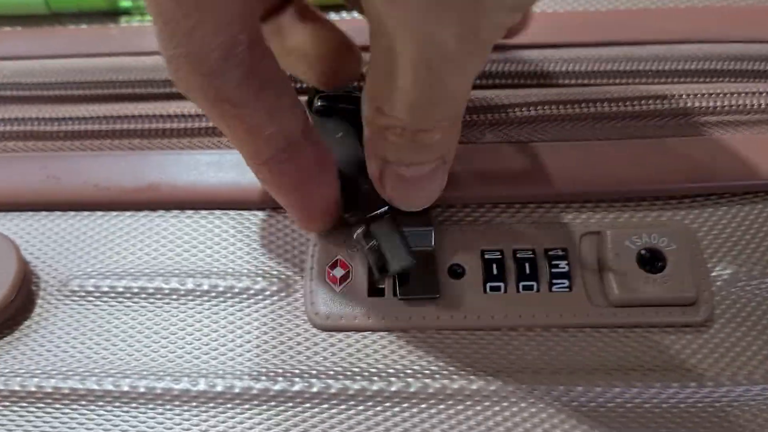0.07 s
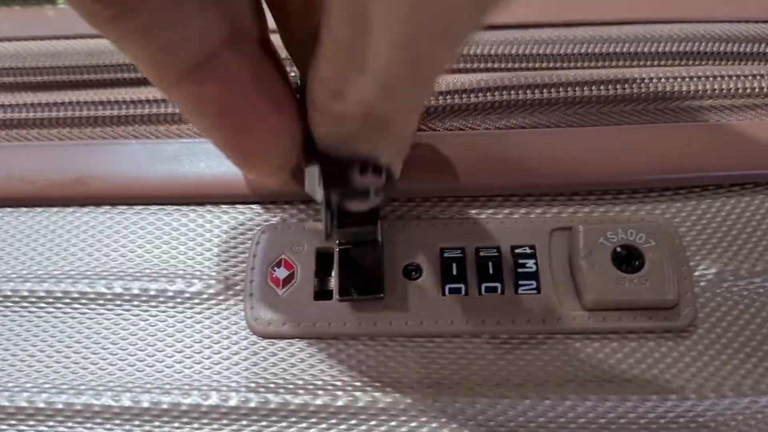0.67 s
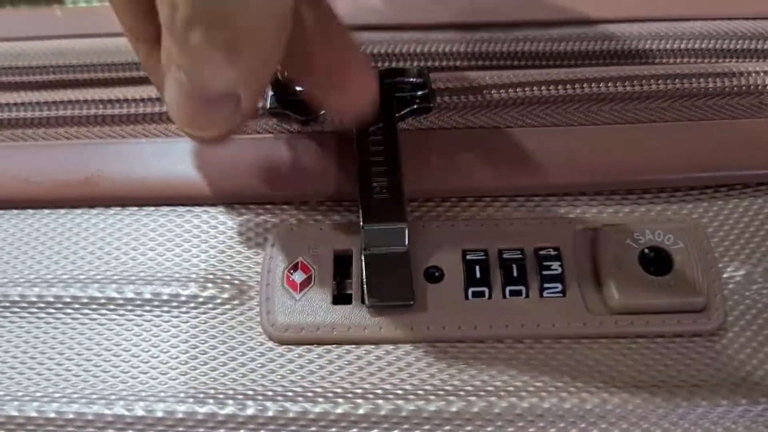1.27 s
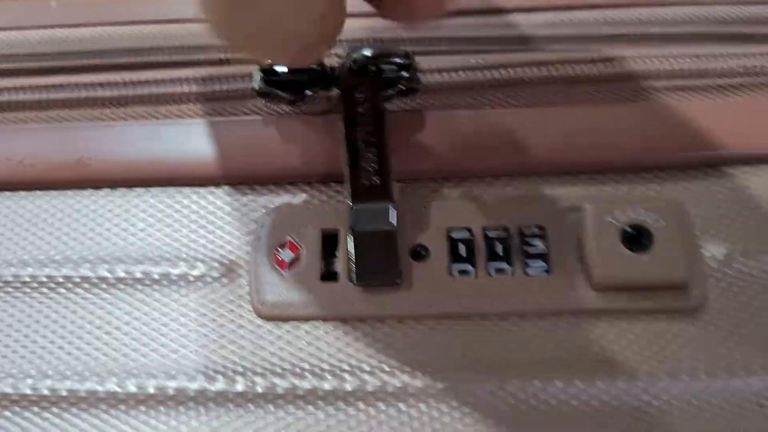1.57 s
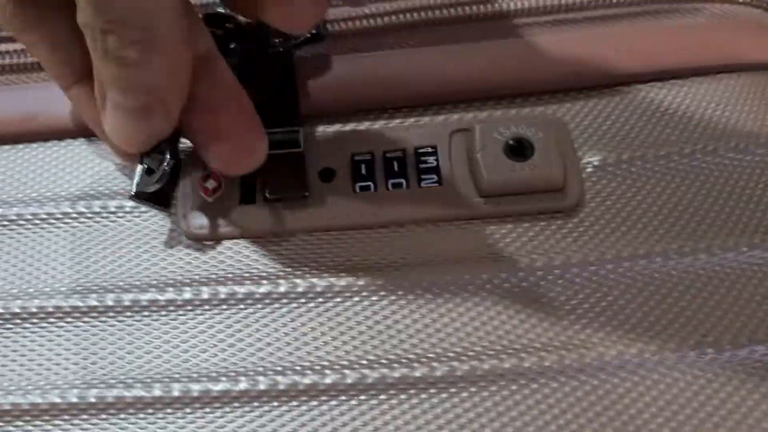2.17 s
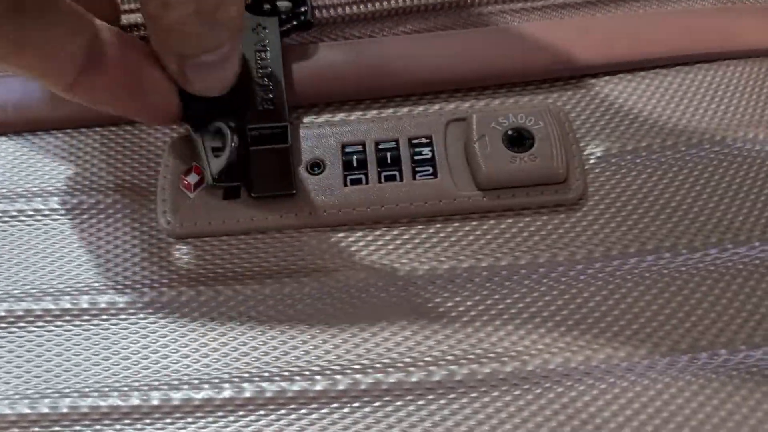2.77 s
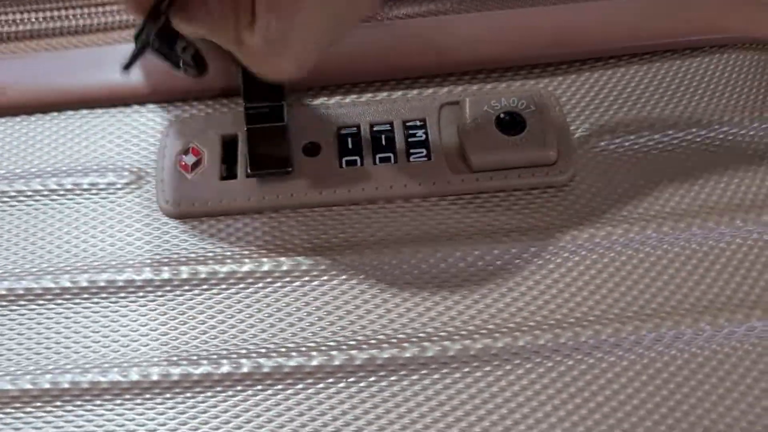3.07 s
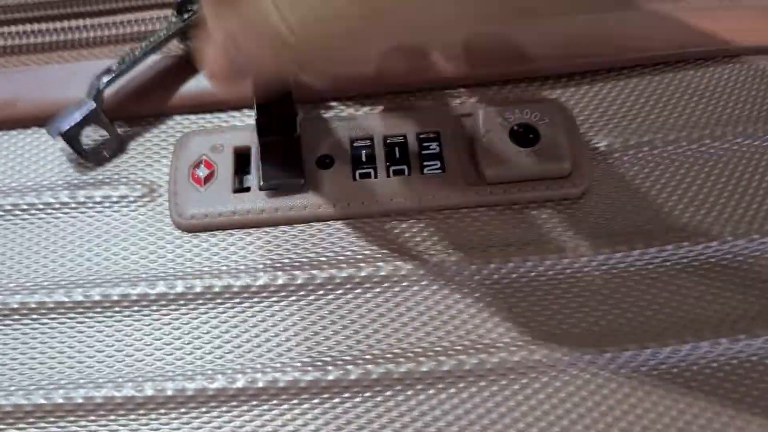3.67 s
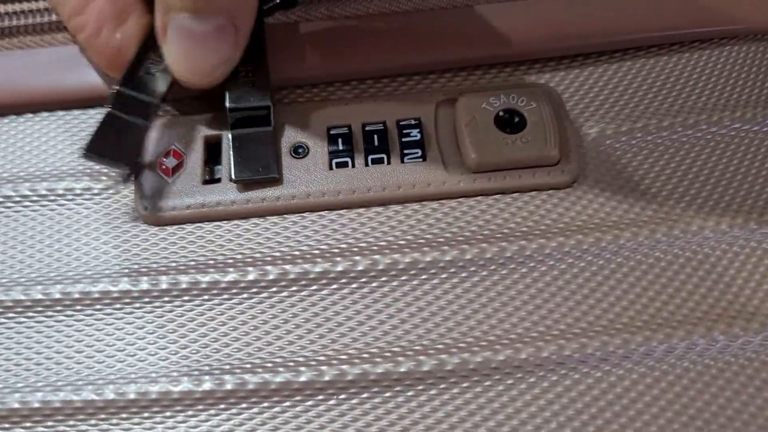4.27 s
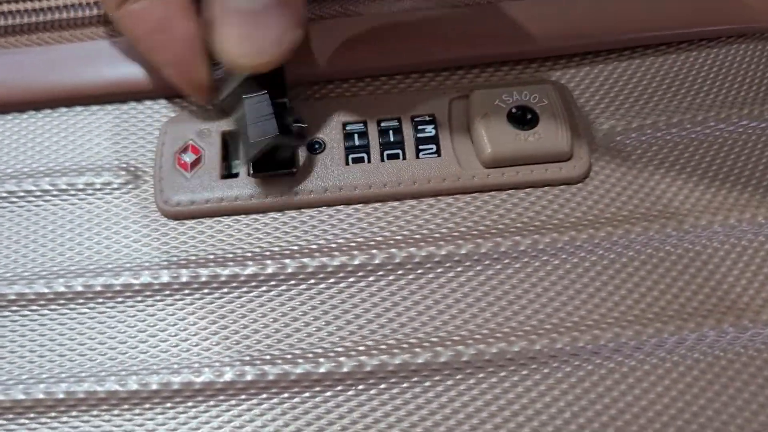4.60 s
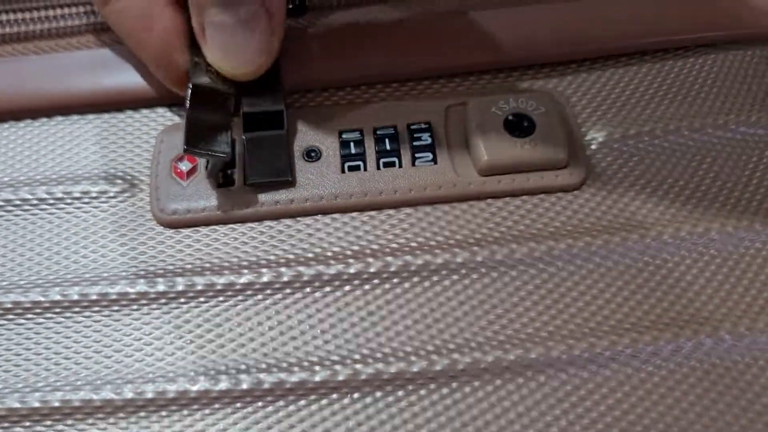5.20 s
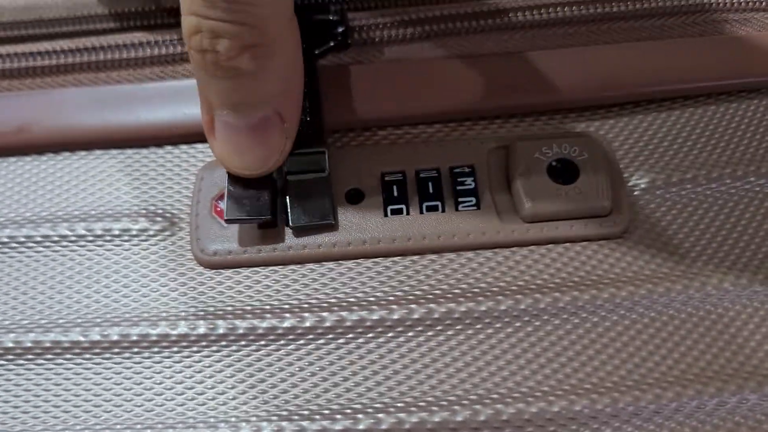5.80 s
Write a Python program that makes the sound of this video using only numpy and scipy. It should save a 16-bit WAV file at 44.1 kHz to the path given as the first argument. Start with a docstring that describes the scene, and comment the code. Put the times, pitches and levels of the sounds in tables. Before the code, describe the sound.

Metal zipper pulls are fumbled into the combination lock of a hard plastic suitcase, close by. A quick cluster of clicks with a tiny jingle and scrape opens the first 0.3 seconds. Lighter clicks and dull bumps follow from 0.6 to 1.3, then only faint taps until about 2. From 2.2 to 2.9 come louder, sharp clacks, with a bright metallic ring at 2.4 and hollow thumps from the shell. Another loud flurry at 3.5 runs into a gritty scrape over the zipper. Between 4 and 4.7 the pulls knock, scrape and click busily on plastic and metal. Near 4.9 the sprung catch snaps once with a brief high buzz. A few dull taps and clicks follow around 5.1 to 5.6, and a last light one near 6. Low handling rumble and faint finger rubbing continue underneath, and the small quiet room adds a short echo.

```python
"""Two metal zipper pulls are fumbled into the combination lock of a hard plastic suitcase, close by.
Each click knocks the plastic housing, clacks the slider and shakes the hollow shell. The pulls also
ring when they swing free, scrape over the zipper and bump the bare plastic. Near the end the sprung
catch snaps once. The harder the hand works, the louder the rumble, rubbing and faint ticks.
A small quiet room adds a short echo."""
import sys
import numpy as np
from scipy import signal
from scipy.fft import rfft, irfft, next_fast_len
from scipy.io import wavfile
from scipy.ndimage import map_coordinates

SR = 44100
rng = np.random.default_rng(int(sys.argv[2]) if len(sys.argv) > 2 else 0)


def wrap_up_sound(samples):
    """Save the sound to the file named by the first command line argument, as 16-bit audio."""
    columns = np.atleast_2d(samples).T
    # keep every value between -1 and 1, then stretch to whole-number steps
    tamed = np.clip(columns, -1, 1)
    steps = np.round(tamed * 32767).astype(np.int16)
    wavfile.write(sys.argv[1], SR, steps)


N = 266540
HIT_TIME = np.arange(SR // 4) / SR  # seconds since a contact began

# How hard the hand works, given as the level of its rumble: time_s, level_db
EFFORT = [(0, -45.5), (.2, -50), (.45, -52), (.85, -50), (1.19, -50), (1.55, -54), (1.9, -51.5),
          (2.47, -47.5), (3.0, -50), (3.4, -49), (3.6, -49), (3.88, -58), (4.08, -46), (4.6, -52),
          (4.9, -49.5), (5.26, -58.5), (5.63, -48), (5.88, -56), (6.04, -47)]
# Tone colour of the shell's rumble, the finger rub and the room's hush: frequency_hz, level_db
RUMBLE_SPECTRUM = [(20, -29.5), (45, -6), (82, 3.5), (140, -6.5), (200, -1.5), (255, -3.5), (350, -12),
                   (500, -22.5), (1200, -60.5)]
RUB_SPECTRUM = [(150, -26.5), (450, 2), (700, -0.5), (1050, 1), (1500, -8), (2400, -12), (4000, -21),
                (7000, -26.5), (9500, -46), (16000, -33.5)]
HUSH_SPECTRUM = [(100, -10.5), (400, 2.5), (700, -2.5), (1050, -8.5), (1500, -17.5), (2400, -13),
                 (4000, -24.5), (7000, -25), (9500, -36), (16000, -30)]
# A pull strikes the metal of the lock: start_s, knock_db, clack_db, metal_db, chatter_ms
CLICKS = [(0.086, -54, -58.5, -40.5, 2.3), (.095, -35, -30.5, -26, 1.2), (.129, -40.5, -42.5, -38.5, 5),
          (0.1471, -35, -40.5, -35, 5), (0.2124, -35, -31.5, -57, 2.6), (0.325, -48, -51.5, -47, 3),
          (0.406, -57, -51, -60.5, 3.2), (.8507, -46, -26.5, -49, 0.47), (.974, -38.5, -41, -47.5, 3.2),
          (1.107, -43, -44.5, -35, 3.8), (1.159, -41.5, -48.5, -53.5, 7.2), (1.2767, -44.5, -51, -43, 1.6),
          (1.3118, -34, -38, -47, 5.2), (1.4172, -59, -64, -56, 1.8), (1.943, -52.5, -52.5, -46.5, 1.2),
          (1.9914, -47.5, -51, -56.5, 1.4), (2.113, -57.5, -62.5, -54.5, 2.3),
          (2.162, -36.5, -37.5, -50.5, 1.3), (2.2827, -26.5, -34, -47.5, 3.4),
          (2.3845, -39.5, -49.5, -40.5, 12), (2.405, -26.5, -18, -31, 2.7), (2.4522, -26, -30.5, -42, 4),
          (2.461, -31.5, -39, -44, 6.5), (2.4809, -50, -31.5, -56, 0.76), (2.5122, -35, -53, -47, 3.6),
          (2.5323, -36, -41, -48, 4), (2.6126, -55, -48, -55, 2), (2.684, -31.5, -34.5, -36.5, 3.6),
          (2.772, -36.5, -39.5, -45.5, 0.77), (2.8348, -17.5, -19.5, -31, 2.7),
          (2.8675, -20.5, -27, -65, 0.73), (2.8709, -22, -24.5, -44, 3), (2.967, -45.5, -53, -51, 6.1),
          (3.09, -43, -41.5, -56, 5.3), (3.4698, -23, -26, -48, 2.7), (3.5369, -17.5, -19, -32.5, 0.75),
          (3.5495, -21, -30, -50, 1.1), (3.5679, -22.5, -30, -45, 1.97), (3.5831, -37, -32.5, -39.5, 0.83),
          (3.605, -20.5, -22, -39, 0.65), (3.6333, -35.5, -37, -58, 2), (3.679, -34.5, -38, -53, 2),
          (3.699, -36, -36, -53, 3.7), (3.7492, -35.5, -53.5, -58, 1.5), (4.097, -30, -33.5, -58, 1.4),
          (4.119, -30.5, -32.5, -36.5, 1.4), (4.1978, -30.5, -35.5, -44, 4.6), (4.2077, -30, -33, -36.5, 2),
          (4.2668, -36, -45.5, -35.5, 1.5), (4.2989, -36.5, -35, -55, 2), (4.3171, -30, -39, -48.5, 2.5),
          (4.3304, -41.5, -41.5, -61, .6), (4.3881, -42.5, -44, -50.5, 1.8), (4.4739, -35, -41, -57, 3.3),
          (4.49, -31.5, -35, -47.5, 16), (4.5391, -55.5, -39, -46.5, 2.4), (4.6583, -37.5, -42, -37, 1.6),
          (4.6748, -32, -37.5, -46.5, 7.6), (4.7236, -37, -38, -40, 1.8), (4.8484, -26.5, -26.5, -41, 2.1),
          (4.8612, -26.5, -29.5, -23.5, 3), (5.415, -52.5, -49, -65, 1.2), (5.57, -28.5, -39, -46, 1.1),
          (5.58, -42.5, -40.5, -41.5, .8), (5.6351, -30.5, -36.5, -39.5, 4.9),
          (5.9752, -36, -42.5, -54, 3.2)]
# Resonances of the housing (knock), slider (clack) and metal (crack): pitch_hz, width_hz, level_db
HOUSING_RESONANCES = [(275.3, 68, 6), (704, 140, -9), (752, 350, 1), (1160, 244, 6.5), (1428, 310, -7.5),
                      (1735, 90, -11.5), (1938, 550, 11.5)]
SLIDER_RESONANCES = [(2268, 300, 2), (2630, 400, 12.5), (2940, 1300, 2.5), (3750, 2100, -15),
                     (4340, 600, -13.5)]
METAL_RESONANCES = [(4730, 440, -2.5), (5880, 650, -1.5), (6610, 310, 4), (7240, 360, -3.5),
                    (8180, 400, -11), (9270, 700, -17.5)]
# Tone colour of the short ting of a gripped pull: frequency_hz, level_db
TING_SPECTRUM = [(7000, -50.5), (10200, -23.5), (11200, -9.5), (12300, 2.5), (13200, -4), (14200, -16.5),
                 (15300, -15), (16300, -24)]
# The hand presses on the hollow shell: start_s, level_db, pitch_hz
PUSHES = [(0.153, -40.5, 242), (0.975, -40.5, 233), (1.175, -31.5, 259), (2.404, -37, 239),
          (2.419, -39, 106), (2.42, -27, 245), (2.459, -37.5, 248), (2.836, -27.5, 267), (2.929, -44, 96),
          (3.209, -42, 89), (3.537, -39, 96), (3.539, -29.5, 189), (3.552, -32, 239), (4.209, -33.5, 84.5),
          (4.279, -44, 85.6), (4.503, -31, 247), (5.32, -36, 265), (5.572, -32, 86.6), (5.571, -34.5, 202),
          (5.735, -34, 135.5)]
# A pull swings free and rings: start_s, level_db
JINGLES = [(0.094, -44.5), (0.13, -33.5), (.1465, -30.5), (.2128, -36), (.8507, -41.5), (.974, -65),
           (2.2823, -37), (2.3845, -40.5), (2.405, -15.5), (2.42, -28.5), (2.461, -37.5), (2.4805, -35.5),
           (2.5323, -46.5), (2.6366, -42.5), (2.684, -34.5), (3.5384, -28), (3.5496, -31), (3.7483, -50),
           (4.8586, -31.5), (5.6355, -50)]
# The tones of a free pull: pitch_hz, level_db
PULL_TONES = [(6605, -6.5), (7060, -13), (8540, -16), (11230, -4), (12300, -17.5), (12405, 0.5),
              (12550, -4.5), (12960, -17.5)]
# The pulls drag over the zipper and the shell: start_s, end_s, level_db
SCRAPES = [(0.122, .25, -42.5), (0.831, 0.885, -40), (2.452, 2.553, -44), (2.6, 2.712, -58.5),
           (3.543, 3.667, -30.5), (3.66, 3.769, -40.5), (4.013, 4.148, -35.5), (4.193, 4.52, -55),
           (4.652, 4.75, -50)]
# Tone colour of a scrape: frequency_hz, level_db
SCRAPE_SPECTRUM = [(150, -17.5), (450, -2.5), (900, 2), (1800, -5.5), (3000, -6), (6500, -17.5),
                   (9000, -42), (12500, -32), (16000, -58)]
# A pull bumps bare plastic; each bump's own cutoff sets how dull it sounds: start_s, knock_db, cutoff_hz
TOCKS = [(0.607, -35.5, 1120), (.652, -50, 2000), (0.8379, -33, 1710), (0.8735, -38.5, 3000),
         (1.244, -48, 7000), (1.641, -52, 6000), (1.7501, -55.5, 9000), (2.0407, -35, 4000),
         (2.055, -45, 9000), (2.093, -51, 6000), (2.1365, -47, 8000), (2.6366, -40.5, 6000),
         (3.175, -44, 9020), (3.307, -48, 4980), (3.3637, -40.5, 6000), (3.3906, -42, 5000),
         (3.7163, -34.5, 5000), (3.7933, -44, 3000), (3.8466, -44, 2370), (4.037, -39, 6500),
         (4.092, -32, 6400), (4.1032, -28.5, 6000), (4.1114, -29, 8000), (4.1673, -44, 9000),
         (4.2831, -35, 6000), (4.2887, -32.5, 6010), (4.37, -37, 6030), (4.4412, -39, 2220),
         (4.5084, -29, 4000), (4.874, -35.5, 6000), (5.0724, -30, 2600), (5.319, -32, 2613),
         (5.3869, -37, 1560), (5.549, -41.5, 2400)]
# The catch spring is let go: start_s, level_db
RELEASES = [(4.8605, -27)]
# Resonances of the buzzing spring: pitch_hz, width_hz, level_db
SPRING_RESONANCES = [(5050, 220, 7), (5880, 190, -8.5), (6380, 380, 6.5), (6930, 240, -14),
                     (8520, 250, -16.5), (11500, 350, 0.5), (12900, 110, 11), (13330, 200, -6)]
# The spring's lasting tones (a fade is the time to drop 60 dB): pitch_hz, level_db, fade_s
SPRING_TONES = [(5900, -4, .22), (6600, -1, .33), (7000, -2.5, .3)]
# How the left microphone differs from the right: frequency_hz, phase_lead_rad, louder_by_db
MIC_DIFFERENCES = [(200, 1, -1), (750, -0.5, 1), (1400, -0.67, -4.5), (2007, -1.56, 0.5),
                   (3000, -1.22, -3.5), (4500, -1.85, 3.5), (6000, -0.45, 5.5), (6780, -2.5, 4),
                   (8000, -1.2, -11.5), (10000, -3, 4), (12670, -0.94, -2.5), (15000, -2, 1.5)]
# How long the room echoes: frequency_hz, fade_s
ROOM_FADES = [(100, .45), (300, 0.47), (1000, 0.44), (2400, 0.53), (6500, 0.41), (9000, 0.38), (13000, 0.2),
              (16000, 0.055)]


def amp(db):
    """Turn decibels into a gain."""
    return 10 ** (np.asarray(db) / 20)


def unit(x):
    """Scale to an average (rms) level of 1."""
    return x / np.sqrt(np.mean(x ** 2) + 1e-20)


def unit_start(x):
    """Scale so that the first 10 ms have an average (rms) level of 1."""
    return x / np.sqrt(np.mean(x[..., :SR // 100] ** 2) + 1e-20)


def along(points, hz):
    """Read a curve of (frequency, value) points on a log frequency axis."""
    point_hz, values = np.transpose(points)
    return np.interp(np.log(hz + 1), np.log(point_hz), values)


def filtered(x, response):
    """Give each frequency the gain and phase that response(hz) asks for."""
    length = x.shape[-1]
    size = next_fast_len(length + 4096, real=True)
    return irfft(rfft(x, size) * response(np.fft.rfftfreq(size, 1 / SR)), size)[..., :length]


def add(track, start_s, x):
    """Mix x into the track at start_s."""
    part = track[..., max(0, round(start_s * SR)):][..., :x.shape[-1]]
    part += x[..., :part.shape[-1]]


def wobble(per_s):
    """A smooth curve through per_s random points a second."""
    points = rng.standard_normal(int(N * per_s / SR) + 4)
    return map_coordinates(points, [np.arange(N) * per_s / SR])


def noise(spectrum, width, grit_db):
    """Coloured stereo noise; width sets left and right apart, grit_db roughens the level."""
    white = rng.standard_normal((3, N))
    grit = amp(grit_db * rng.standard_normal(N // 32 + 1)).repeat(32)[:N]
    stereo = (white[0] + width * white[1:]) * grit
    return unit(filtered(stereo, lambda hz: amp(along(spectrum, hz))))


def effort(times):
    """The rumble level in dB, and the dB that this effort adds to rubs and ticks."""
    rumble_db = np.interp(times, *np.transpose(EFFORT))
    easy_db = -50
    return rumble_db, 1.6 * (rumble_db - easy_db)


def handling():
    """The hand keeps the shell rumbling while the fingers rub on it."""
    rumble_db, boost_db = effort(np.arange(N) / SR)
    rumble = amp(rumble_db + 0.55 * wobble(9.6)) * noise(RUMBLE_SPECTRUM, width=0.16, grit_db=4.5)
    rub = amp(-61.5 + boost_db + 3.1 * wobble(25)) * noise(RUB_SPECTRUM, width=0.36, grit_db=3.5)
    return rumble + rub


def room_hush():
    """The steady, faint noise of a still room."""
    return amp(-62.5) * noise(HUSH_SPECTRUM, width=1, grit_db=1)


def tick_rows(per_s=5.1):
    """The pulls stir at random between the fingers, louder with effort; rows are like CLICKS."""
    count = int(per_s * N / SR)
    times = (np.arange(count) + rng.random(count)) / per_s
    boosts_db = effort(times)[1] - rng.standard_normal(count)
    return [(start_s, db - 53.5, db - 58.5, db - 67.5, 1.5) for start_s, db in zip(times, boosts_db)]


def pulse(spectrum, size=2048):
    """The shortest click that has this tone colour (a minimum-phase pulse)."""
    cepstrum = irfft(np.log(amp(along(spectrum, np.fft.rfftfreq(size, 1 / SR)))))
    return irfft(np.exp(rfft(2 * cepstrum[:size // 2], size)))


def body(resonances, size=2048):
    """How a part that hardly rings answers one sharp tap."""
    hz = np.fft.rfftfreq(size, 1 / SR)
    return irfft(sum(amp(db) * 1j * hz * width / (pitch ** 2 - hz ** 2 + 1j * hz * width)
                     for pitch, width, db in resonances))


def varied(table, spread_db):
    """A part struck at another spot: each of its levels changes at random."""
    rows = np.array(table, float)
    rows[:, -1] += spread_db * rng.standard_normal(len(rows))
    return rows


def regripped(table, spread_db, detune=0.016):
    """A part gripped another way: its levels change and its pitches shift a little."""
    rows = varied(table, spread_db)
    rows[:, 0] *= 1 + detune * rng.standard_normal()
    return rows


def chatter(halving_ms, size=1024):
    """The force of a contact: one sharp blow, then tiny bounces that die away."""
    grains = rng.standard_normal((3, size)) * rng.exponential(1, size) ** 1.37
    bounces = (grains[0] + 0.91 * grains[1:]) * np.exp(-700 * HIT_TIME[:size] / halving_ms)
    force = bounces / np.sqrt(np.sum(bounces ** 2) / 2)
    force[:, 0] += 1.02 / halving_ms  # brief contacts are nearly all first blow
    return force


def soft_attack(rise_ms=4.6, size=512):
    """A tiny swell of noise just before each click softens its attack."""
    swell = rng.standard_normal((2, size)) * np.exp(-1000 * HIT_TIME[:size] / rise_ms)[::-1]
    return swell / np.sqrt(np.sum(swell ** 2) / 2)


def radiation(size):
    """One filter a part: housing and slider give off little treble, crack and ting little bass."""
    hz = np.fft.rfftfreq(size, 1 / SR)
    cutoffs_hz = [("low", 1920), ("low", 5350), ("high", 4500), ("high", 10000)]
    filters = [signal.butter(4, cutoff, kind, fs=SR, output="sos") for kind, cutoff in cutoffs_hz]
    return np.array([signal.sosfreqz(sos, hz, fs=SR)[1] for sos in filters])


def strike(knock_db, clack_db, metal_db, chatter_ms, size=4096):
    """One force shakes housing, slider and pull; gives the sound and the seconds before the blow."""
    knock = body(regripped(HOUSING_RESONANCES, spread_db=4.5))
    clack = body(regripped(SLIDER_RESONANCES, spread_db=1.5))
    crack = body(regripped(METAL_RESONANCES, spread_db=9))
    ting = pulse(regripped(TING_SPECTRUM, spread_db=4))
    parts = rfft([knock, clack, crack, ting], size) * radiation(size)
    force = chatter(chatter_ms)
    swell = amp(-16.5) * np.linalg.norm(force[0]) * soft_attack()
    hits = irfft(parts[:, None] * rfft(np.hstack([swell, force]), size))
    lead = swell.shape[1]
    onsets = hits[..., lead:lead + SR // 100]  # the first 10 ms set each part's level
    gains = amp([knock_db, clack_db, metal_db, metal_db - 1]) / np.sqrt(np.mean(onsets ** 2, (1, 2)))
    return np.tensordot(gains, hits, 1), lead / SR


def clicks(rows):
    """A pull hits the metal of the lock, one click for each row."""
    out = np.zeros((2, N))
    for start_s, *contact in rows:
        sound, lead_s = strike(*contact)
        add(out, start_s - lead_s, sound)
    return out


def tone(hz, fade_s, wander=0):
    """A fading sine wave; higher ones differ more in phase between left and right."""
    phase = rng.normal(0, 1, (2, 1)) * min(1, hz / 6000)
    return np.sin(2 * np.pi * hz * HIT_TIME + phase + wander) * amp(-60 * HIT_TIME / fade_s)


def shell_booms(panel_hz=257.6, lid_hz=85.5, fade_cycles=10.8, rise_cycles=0.6):
    """The hollow case booms under each push, and knocks shake a panel and the lid; low tones last."""
    out = np.zeros((2, N))
    shakes = [(start_s, knock_db + offset_db, hz * (1 + 0.025 * rng.standard_normal()))
              for start_s, knock_db, *_ in CLICKS + TOCKS
              for hz, offset_db in [(panel_hz, -12.5), (lid_hz, -19.5)]]
    for start_s, level_db, hz in PUSHES + shakes:
        fade_s = fade_cycles / hz
        boom = tone(hz, fade_s) + 0.51 * tone(0.7 * hz, 0.7 * fade_s)
        swell = 1 - np.exp(-HIT_TIME * hz / rise_cycles)
        add(out, start_s, amp(level_db) * unit_start(boom * swell))
    return out


def shiver(blur_hz=22):
    """A loose pull shivers in its loop, so the phase of a tone wanders and blurs its pitch."""
    return np.cumsum(rng.standard_normal(len(HIT_TIME))) * np.sqrt(2 * np.pi * blur_hz / SR)


def jingles():
    """A pull swings free and rings; the fingers change its pitch and colour a little each time."""
    out = np.zeros((2, N))
    for start_s, level_db in JINGLES:
        detune = 1 + 0.002 * rng.standard_normal()
        ring = sum(amp(db) * tone(hz * detune, fade_s=0.07, wander=shiver())
                   for hz, db in varied(PULL_TONES, spread_db=0.5))
        add(out, start_s, amp(level_db) * unit_start(ring))
    return out


def scrapes(slips_per_s=83):
    """Metal drags over zipper teeth and ribbed plastic: a gritty rub with distinct little slips."""
    strokes = np.zeros(N)
    for start_s, end_s, level_db in SCRAPES:
        swell_and_fade = signal.windows.tukey(round((end_s - start_s) * SR), 0.53)
        add(strokes, start_s, amp(level_db) * swell_and_fade)
    kicks = (rng.random(N) < slips_per_s / SR) * amp(2 * rng.standard_normal(N))
    slips = unit(signal.fftconvolve(kicks, pulse(SCRAPE_SPECTRUM))[:N])
    grit = noise(SCRAPE_SPECTRUM, width=0.24, grit_db=2)
    return strokes * (amp(-9) * grit + amp(-3.5) * slips)


def tocks():
    """A pull bumps bare plastic; each bump's own cutoff sets how dull it sounds."""
    out = np.zeros((2, N))
    for start_s, knock_db, cutoff_hz in TOCKS:
        sound, lead_s = strike(knock_db, knock_db - 6.5, knock_db - 18, chatter_ms=1.9)
        low_pass = signal.butter(3, cutoff_hz, fs=SR, output="sos")
        add(out, start_s - lead_s, signal.sosfilt(low_pass, sound))
    return out


def catch_snap():
    """The spring of the catch is let go, buzzes in its seat and sings on faintly."""
    out = np.zeros((2, N))
    fade = amp(-60 * HIT_TIME / 0.04) + amp(-19 - 60 * HIT_TIME / 0.18)  # quick drop, quiet tail
    for start_s, level_db in RELEASES:
        jitter = rng.standard_normal((3, len(HIT_TIME)))
        rattle = (jitter[0] + 0.35 * jitter[1:]) * fade
        buzz = signal.fftconvolve(rattle, body(SPRING_RESONANCES)[None], axes=1)
        ring = sum(amp(db) * tone(hz, fade_s) for hz, db, fade_s in SPRING_TONES)
        add(out, start_s, amp(level_db) * unit_start(buzz))
        add(out, start_s, amp(level_db - 20.5) * unit_start(ring))
    return out


def echo(x, fades, delay_s, alike_below_hz=451):
    """A smooth echo: each frequency fades at its own speed, and both sides share the bass."""
    hz, times, bands = signal.stft(rng.standard_normal((2, SR * 2 // 3)), SR, nperseg=256)
    alike = 1 / (1 + (hz[:, None] / alike_below_hz) ** 2)
    bands[1] = alike * bands[0] + np.sqrt(1 - alike ** 2) * bands[1]
    bands *= amp(-60 * times / along(fades, hz)[:, None])
    tail = signal.istft(bands, SR, nperseg=256)[1]
    tail = np.pad(tail / np.linalg.norm(tail[0]), ((0, 0), (round(delay_s * SR), 0)))
    return signal.fftconvolve(x, tail, axes=1)[:, :N]


def at_microphones(x):
    """The body that holds the microphones shades and delays near sound differently on each side."""
    hz, lead_rad, louder_db = np.transpose(MIC_DIFFERENCES)
    sides = np.array([[0.5], [-0.5]])  # half the difference each way
    levels, phases = np.c_[hz, louder_db], np.c_[hz, lead_rad]
    return filtered(x, lambda f: amp(sides * along(levels, f)) * np.exp(1j * sides * along(phases, f)))


def scene():
    """The lock close by, the short buzz of the case around it, the hand and the room."""
    lock = clicks(CLICKS + tick_rows()) + tocks() + jingles() + catch_snap() + scrapes()
    shell = shell_booms()
    case_fades = [(200, 0.22), (1200, 0.069), (4000, 0.042), (12000, 0.0057)]  # frequency_hz, fade_s
    case_buzz = amp(-12.5) * echo(lock, case_fades, delay_s=0.0027)
    room_echo = amp(-17) * echo(lock + shell, ROOM_FADES, delay_s=0.0082)
    return at_microphones(lock) + shell + case_buzz + room_echo + handling() + room_hush()


def record(dry):
    """Cut the deepest bass, round off the tallest peaks and drop the very highest treble."""
    bottom_hz, top_hz, ceiling = 38, 15950, 0.9
    thinned = signal.sosfilt(signal.butter(3, bottom_hz, "high", fs=SR, output="sos"), dry)
    rounded = thinned / (1 + np.abs(thinned / ceiling) ** 6) ** (1 / 6)
    return filtered(rounded, lambda hz: 1 / (1 + (hz / top_hz) ** 120))


dry = scene()
out = record(dry)
wrap_up_sound(out)
```